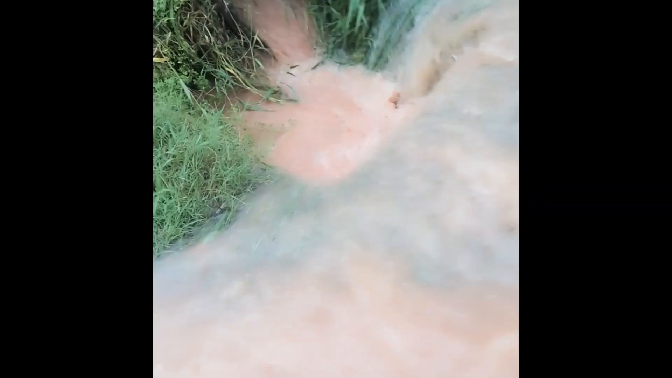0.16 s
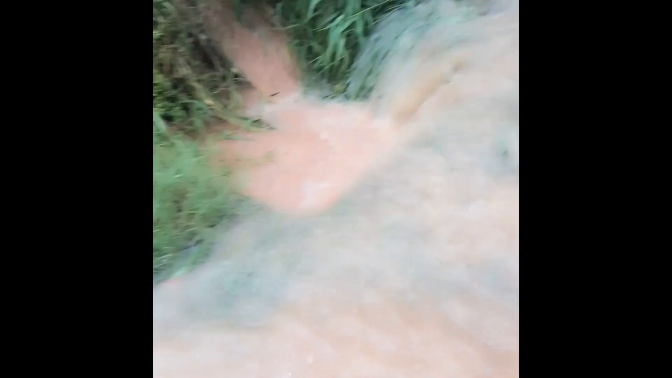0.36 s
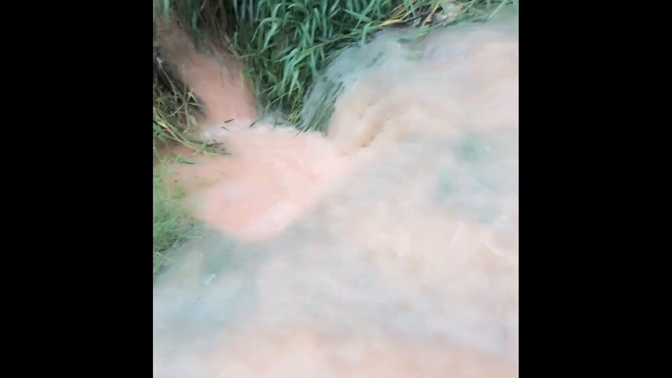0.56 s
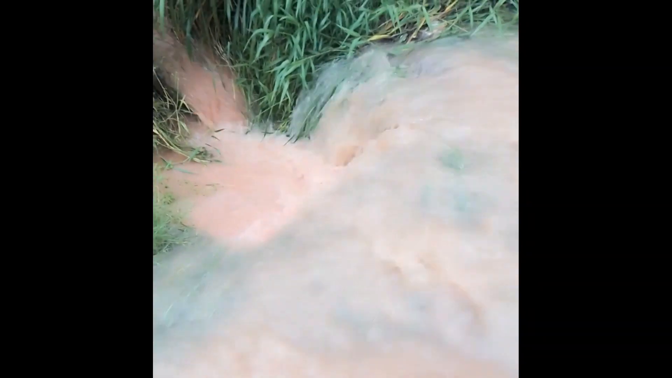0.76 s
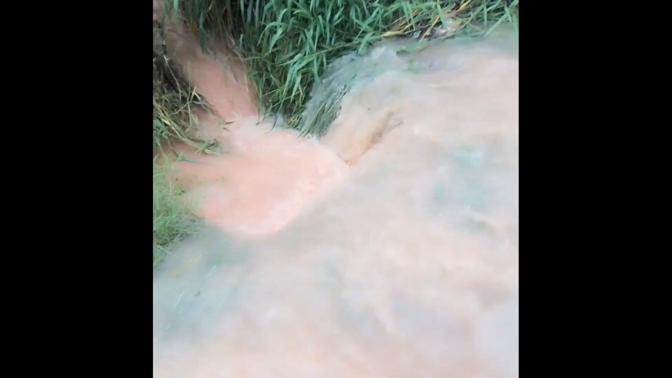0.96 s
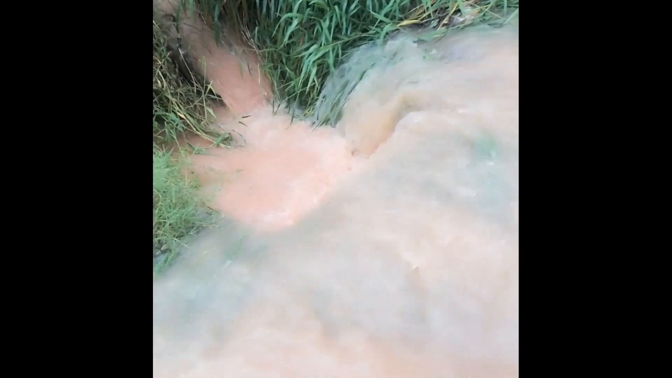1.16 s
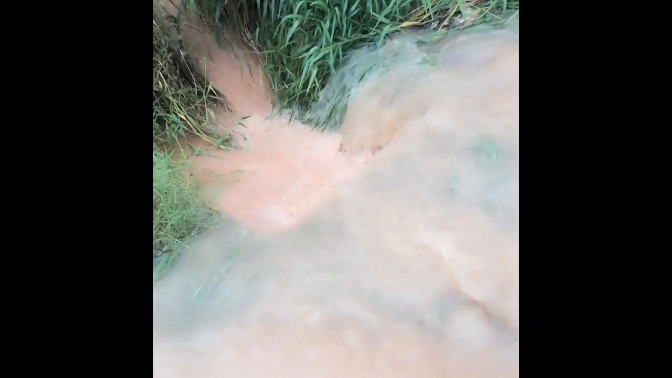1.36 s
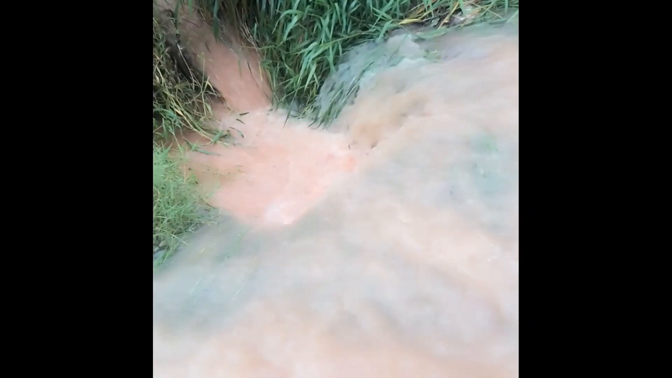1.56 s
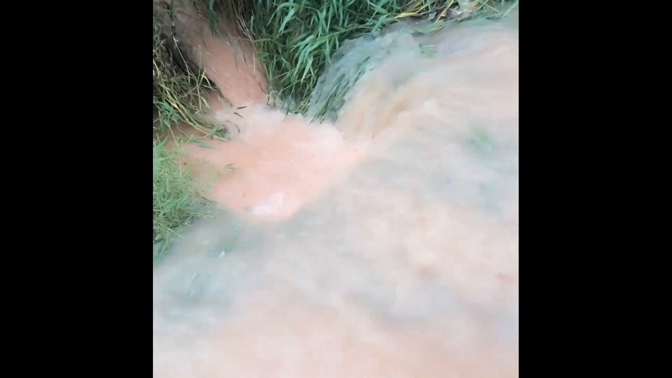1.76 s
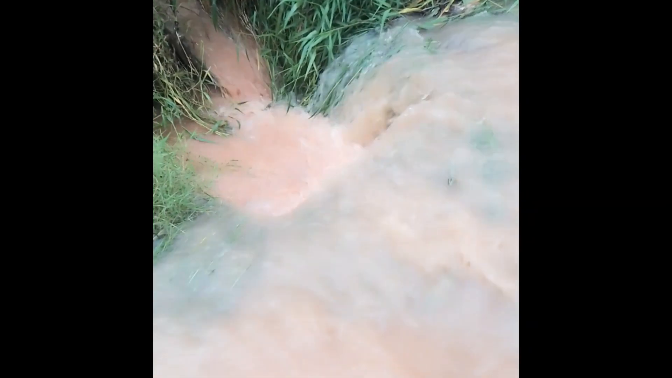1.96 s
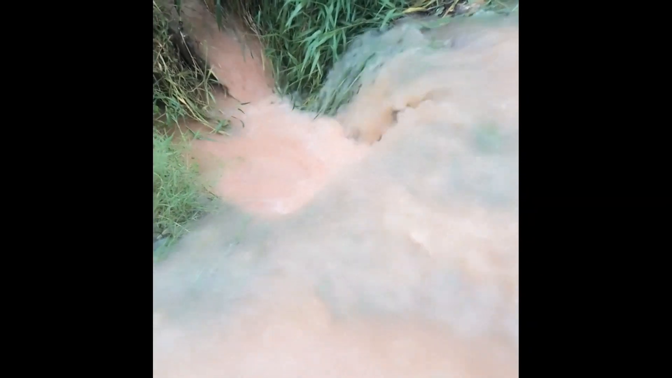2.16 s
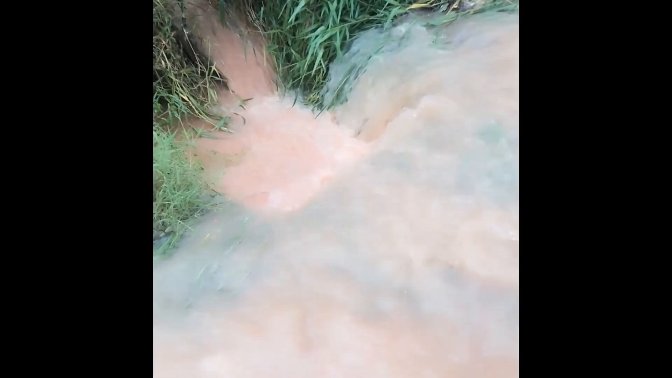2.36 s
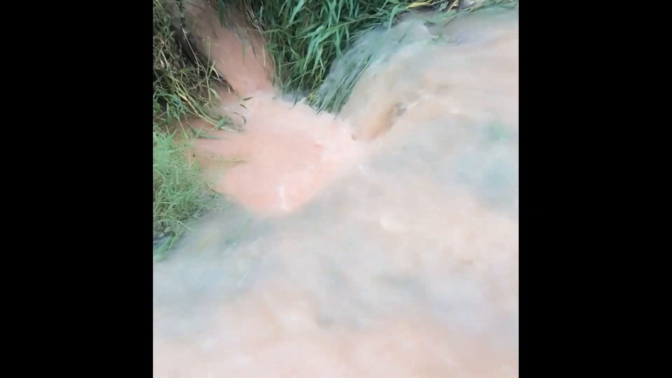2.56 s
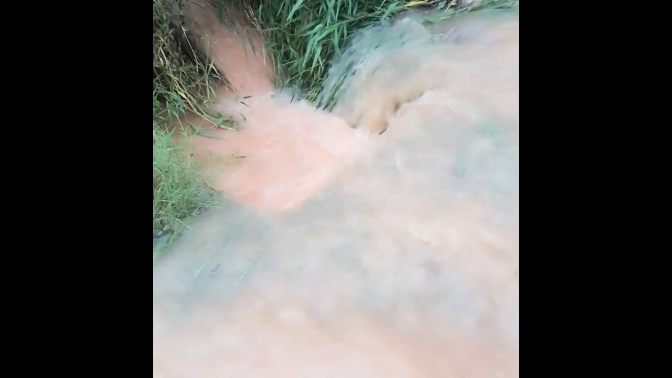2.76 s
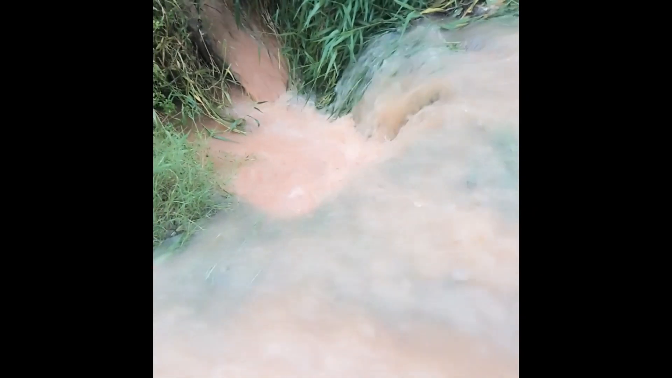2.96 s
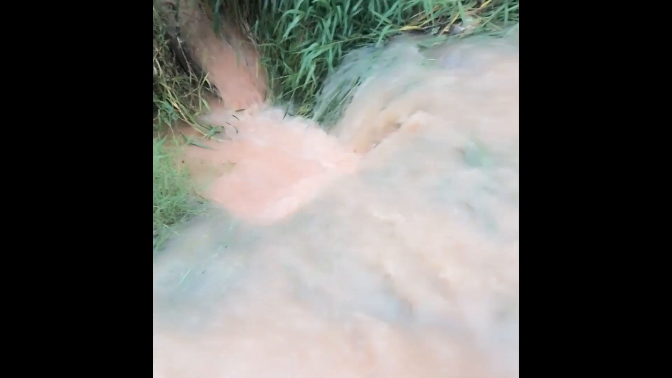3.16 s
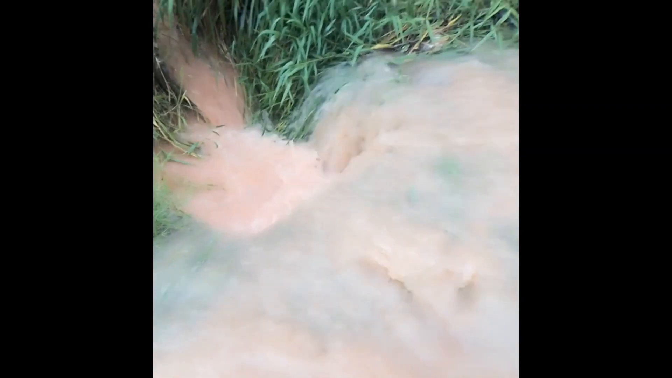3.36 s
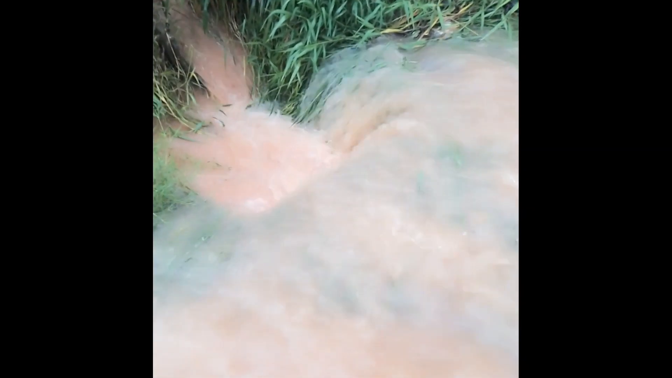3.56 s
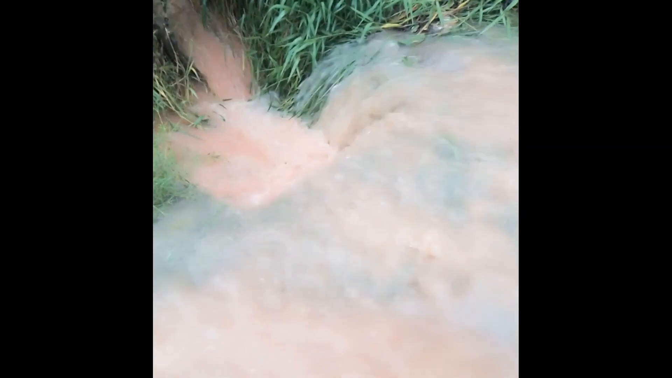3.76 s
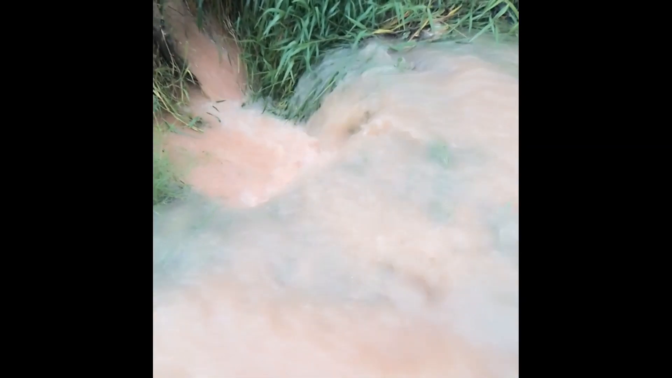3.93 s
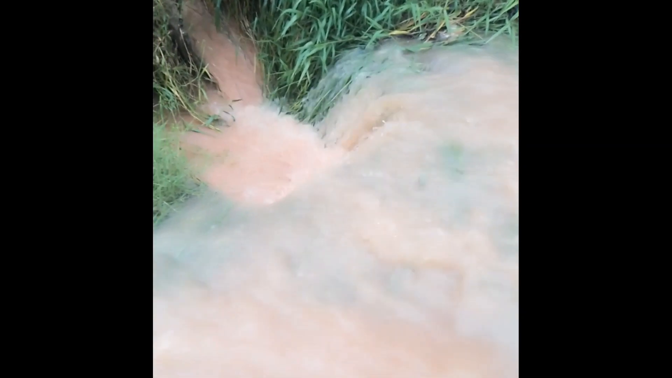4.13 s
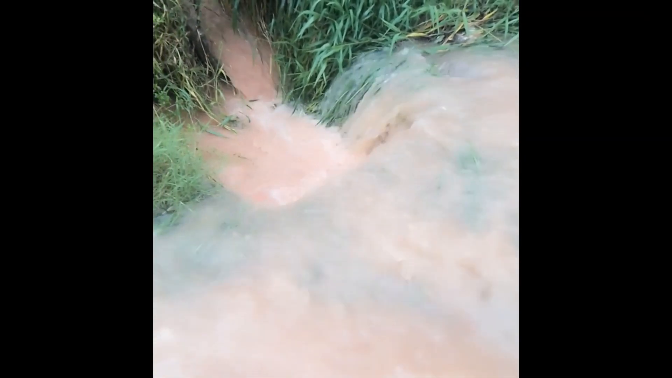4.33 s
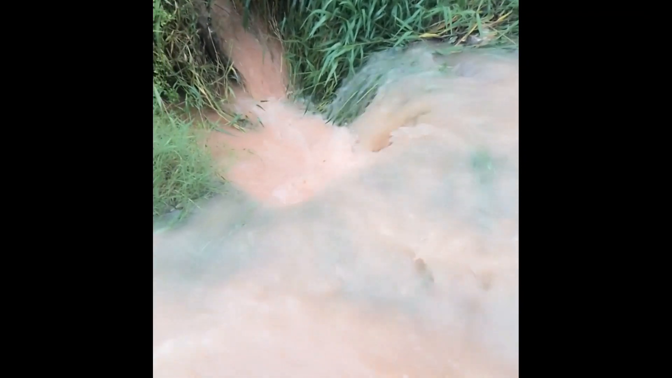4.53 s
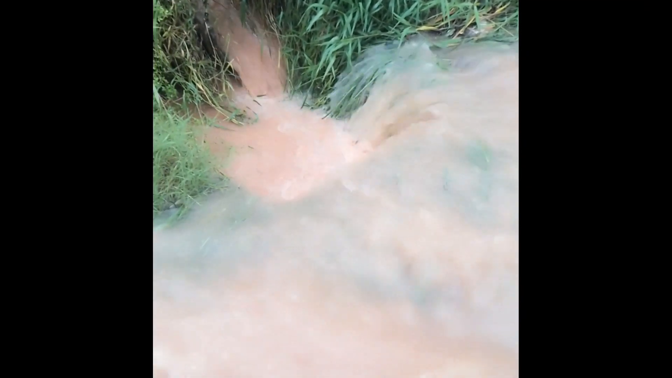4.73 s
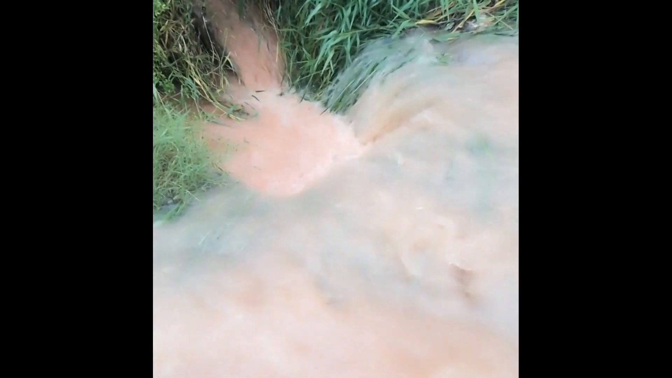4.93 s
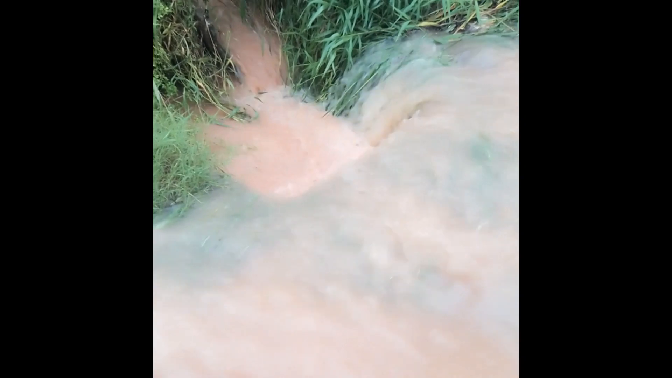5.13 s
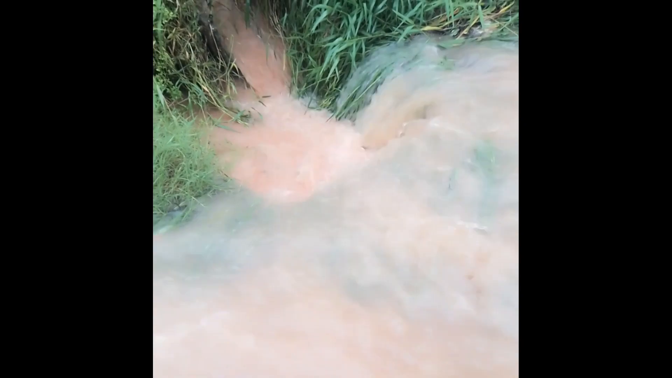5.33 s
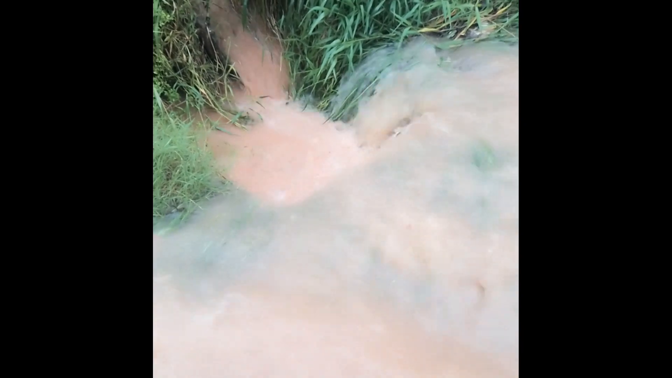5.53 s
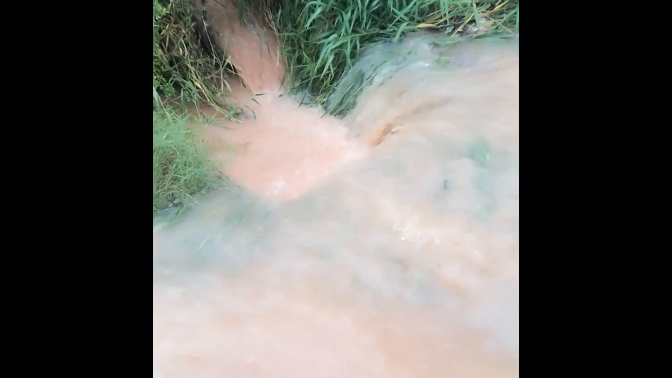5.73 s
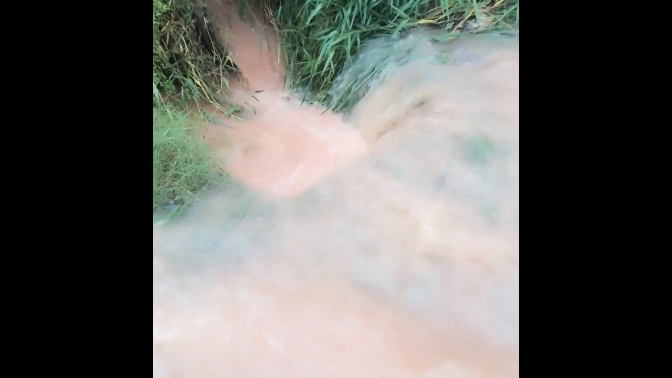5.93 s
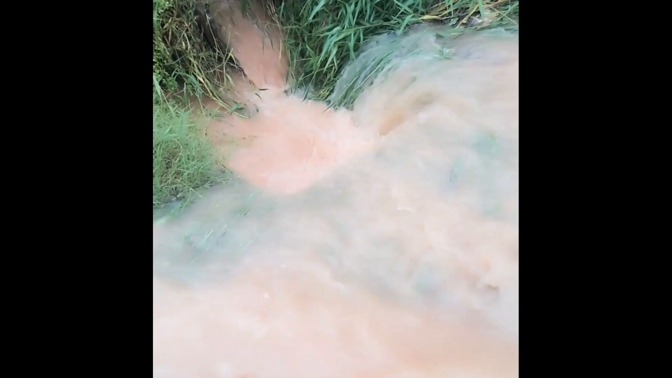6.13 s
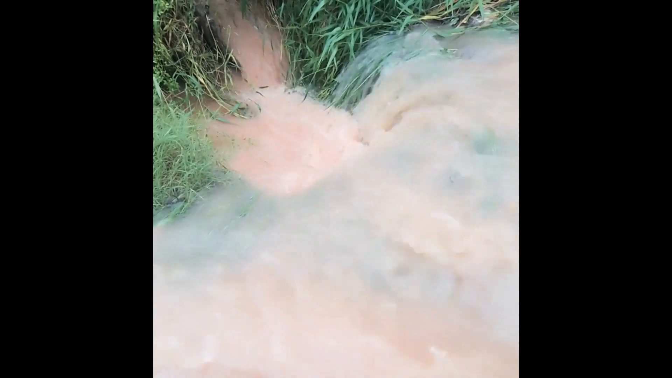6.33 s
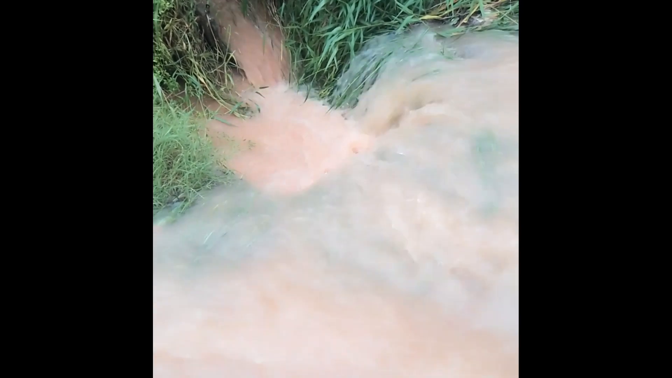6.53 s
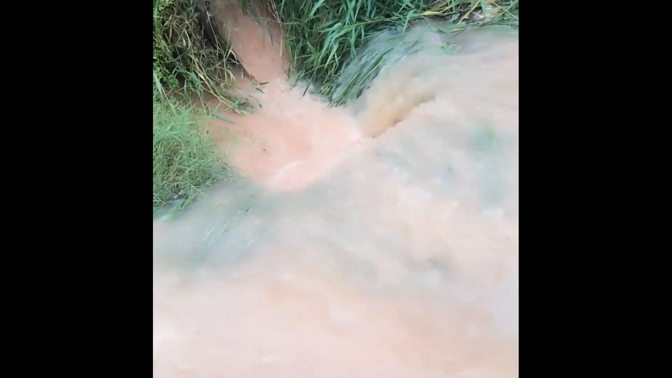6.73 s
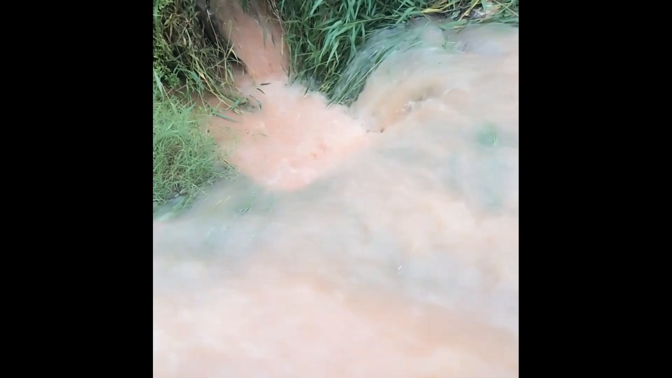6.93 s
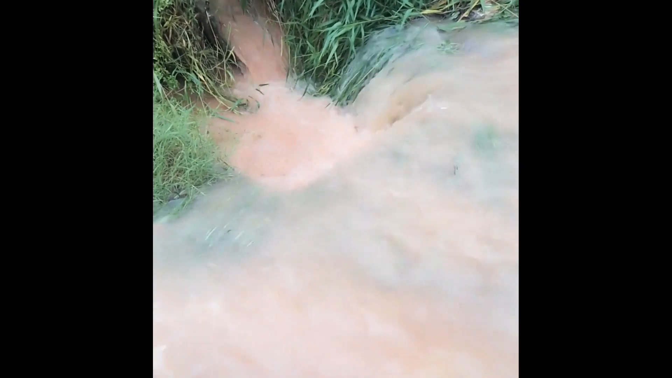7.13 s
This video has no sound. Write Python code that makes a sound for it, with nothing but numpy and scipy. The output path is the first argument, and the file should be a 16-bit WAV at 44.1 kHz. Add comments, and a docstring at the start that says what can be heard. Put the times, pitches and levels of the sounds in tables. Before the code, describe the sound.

Close, continuous roar of fast runoff plunging into a ditch, gurgling with hollow glugs and small splats over a soft low rumble.

```python
"""Storm runoff in a ditch

Muddy water rushes down a grassy ditch, heard close by from the bank, where a side stream plunges in.
Swallowed air roars as a swarm of big ringing bubbles and small ones splash; larger single ones gulp.
Splats ring, slaps and foam are shaped noise and fizz, and low noise makes the bed rumble and thump.
The sound fades in; halfway the hand-held microphone shifts: the roar turns hollow and spreads out."""
import sys
import numpy as np
from scipy import signal
from scipy.fft import rfft, irfft, next_fast_len
from scipy.io import wavfile

SR = 44100
rng = np.random.default_rng(int(sys.argv[2]) if len(sys.argv) > 2 else 0)


def put_to_file(sound):
    """Save the sound as 16-bit audio at rate SR, in the file named by the first command-line argument."""
    columns = np.atleast_2d(sound).T  # one column per channel
    safe = np.clip(columns, -1, 1)
    whole_steps = np.round(safe * 32767)
    wavfile.write(sys.argv[1], SR, whole_steps.astype(np.int16))


N = 317079
TIME = np.arange(N) / SR   # seconds
FFT_SIZE = next_fast_len(N + 8192)
BIN_HZ = np.maximum(np.arange(FFT_SIZE // 2 + 1) * SR / FFT_SIZE, 1)


# colour of the roar at the first and second microphone position:
# (pitch [Hz], left level [dB], right level [dB])
ROAR_COLOUR_FIRST = [(156, -25, -22), (198.5, -20.5, -21.5), (281.5, -5.5, -10), (380, -10, -3),
                     (470, -4.5, -3.5), (540, -2.3, 0), (636, -6, -4.5), (720, -2.5, -2.5), (850, -6.5, -4),
                     (908, -3.5, -6), (954, -11, -13), (1113, -5, -27), (1144, -12, -21.5),
                     (1300, -23, -15.5)]
ROAR_COLOUR_SECOND = [(160, -30, -35), (200, -19, -19.5), (283, -4, -8), (333, -5.5, -15.5),
                      (382, -3.5, -16), (500, -13.5, -7), (630, -11, 0.1), (703, -12, -2.5),
                      (790, -17.5, -3), (840, -12.5, -3.5), (1027, -4.5, -19.5), (1088, -11, -36),
                      (1255, -25.5, -15)]
# wavering colour of the roar:
# (time [s], lift near 300 Hz [dB], lift near 440 Hz [dB], lift near 1.1 kHz [dB])
ROAR_WAVER = [(0.55, 0.5, 1, 2), (1.05, -3, -0.5, 3), (1.35, 0, 0, -1.5), (1.65, 1.5, -3, 0.8),
              (2.2, -0.2, 0, 1.7), (2.8, -2, 0, 0.5), (3.35, 1.5, -2.5, -2.5), (3.9, 2, 1.5, 2),
              (4.35, 2, 1.5, 4), (4.75, 1.5, 1, -0.5), (5.05, 2, -1.5, 1), (5.4, -1, 0.5, 2),
              (5.75, 3, -5, -8), (6.05, -2.5, -3, 2.5), (6.55, -0.5, 1.5, 1), (7.0, 4, -3.5, 5)]
ROAR_FIRST_DB, ROAR_SECOND_DB = -36.5, -38.5   # louder at the first position


def roar(second):
    """Big bubbles driven under by the plunge, blended from two microphone positions (second: 0-1)."""
    bubbles = swarm(200.2, 1259, per_s=1500, spread_db=1.5, cycles=25.5, rise=0.094, wash_db=-3,
                    runs_db=2.0, count=24)
    water = churn(bubbles, surge_db=0.05, surge_rate=24, swell_db=0.17, swell_rate=13)
    lower_db, middle_db, upper_db = in_time(ROAR_WAVER)
    water = lift_band(water, 390, 490, middle_db)
    water = lift_band(water, 280, 327, lower_db)
    water = lift_band(water, 1016, 1200, upper_db)
    first_pair = from_db(ROAR_FIRST_DB) * at_ears(water, ROAR_COLOUR_FIRST, 184, 1212)
    second_pair = from_db(ROAR_SECOND_DB) * at_ears(water, ROAR_COLOUR_SECOND, 166, 1198)
    return (1 - second) * first_pair + second * second_pair


# big single air pockets, level before the trim in gulps():
# (time [s], level [dB], starting pitch [Hz], ring length [cycles])
AIR_POCKETS = [(0.41, -15.5, 620, 30), (0.508, -21.5, 430, 36), (0.514, -27, 1005, 91),
               (0.78, -14, 665, 59), (0.795, -28, 1090, 86), (0.988, -22.5, 1035, 93),
               (1.475, -23, 777, 58), (1.625, -17.5, 549, 64), (1.632, -22, 290, 30),
               (1.989, -15.5, 546, 31), (2.382, -17, 590, 35), (2.44, -24, 258, 26),
               (2.645, -19.5, 660, 46), (2.741, -15.5, 510, 23), (3.064, -14.5, 607, 22),
               (3.176, -15.5, 480, 31), (3.368, -19, 1160, 27), (3.686, -16, 640, 30), (4.04, -20, 392, 26),
               (4.287, -30, 766, 40), (4.386, -21, 950, 65), (4.455, -25, 940, 56), (5.012, -25, 272, 32),
               (5.322, -25, 720, 18), (5.504, -24, 444, 39), (5.633, -19, 724, 18), (5.685, -19.5, 630, 29),
               (5.74, -20, 605, 23), (5.764, -21, 288, 38), (5.891, -24, 990, 70), (6.007, -18.5, 790, 34),
               (6.214, -17, 670, 29), (6.263, -19.5, 750, 55), (6.344, -27, 424, 36), (6.415, -22, 622, 22),
               (6.659, -24, 955, 60)]


def gulps():
    """Big air pockets, each ringing at its own pitch like a struck bell that glides upward."""
    return single_bubbles(AIR_POCKETS, rise=0.096, level_db=-10.5, low_hz=203, high_hz=1380, left_db=0)


# colour of the splashing: (pitch [Hz], left level [dB], right level [dB])
SPLASH_COLOUR = [(1250, 1, 0.5), (1430, -1, -6), (1670, -5, -4), (1840, -2.5, -8), (2170, 0, -8),
                 (2410, -8, -11.5), (2620, -8, -5.5)]
# lift of the highest splash bubbles: (time [s], lift near 2.15 kHz [dB])
SPLASH_TOP = [(0.15, 14.5), (0.25, 12), (0.4, 2), (2.9, 3), (3.75, -2), (5.5, 1), (6.2, -3), (6.9, 0)]
SPLASH_DB = -57.5


def splash():
    """Small bubbles, born in quick clumps where the crests tumble over."""
    bubbles = swarm(1218, 2620, per_s=700, spread_db=2.0, cycles=58, rise=0.064, wash_db=-4,
                    clump_db=2.0, runs_db=2.5, count=22)
    water = churn(bubbles, surge_db=0.18, surge_rate=21, swell_db=0.34, swell_rate=9.3)
    top_db, = in_time(SPLASH_TOP)
    water = lift_band(water, 2130, 2170, top_db)
    return from_db(SPLASH_DB) * at_ears(water, SPLASH_COLOUR, 1326, 2550)


# thrown water falling back, level before the trim in splats():
# (time [s], level of the first bubble [dB], middle pitch [Hz])
FALLING_WATER = [(0.433, -46, 1500), (0.494, -43, 1750), (0.581, -40, 1880), (0.785, -38, 1370),
                 (0.788, -45, 2400), (0.955, -42, 1870), (1.244, -53, 3090), (1.621, -43.5, 1530),
                 (1.803, -40, 1400), (2.144, -43, 2080), (2.246, -40, 2000), (2.623, -44, 1670),
                 (2.721, -43, 2300), (3.44, -40, 1970), (3.495, -36, 1840), (3.54, -44, 1570),
                 (4.091, -44, 2120), (5.018, -47, 1930), (5.051, -36, 1860), (5.1, -44, 1410),
                 (5.144, -46, 3180), (6.064, -45, 2150), (6.177, -44.5, 2280), (6.52, -43, 2120),
                 (6.64, -40, 1750), (6.647, -45, 2440), (6.791, -40, 1410), (6.794, -51, 3020),
                 (6.812, -50, 2130)]
SPLAT_GAP_S, SPLAT_LOSS_DB = 0.0038, 3   # average gap and loss from bubble to bubble
SPLAT_OCTAVES, SPLAT_CYCLES = 0.14, 37   # spread in pitch either way, ring length


def splats():
    """Each splat traps four bubbles of about one size, in quick succession and ever weaker."""
    chance = rng.uniform(-0.965, 1, (len(FALLING_WATER), 4, 2))
    bubbles = []
    for (s, db, hz), draws in zip(FALLING_WATER, chance):
        for k, (late, detune) in enumerate(draws):
            born_s = s + SPLAT_GAP_S * k * (1 + 0.294 * late)
            pitch_hz = hz * 2 ** (SPLAT_OCTAVES * detune)
            bubbles.append((born_s, db - SPLAT_LOSS_DB * k, pitch_hz, SPLAT_CYCLES))
    return single_bubbles(bubbles, rise=0.081, level_db=-6.0, low_hz=1210, high_hz=3500, left_db=6)


# sheets of water slap flat onto the surface: (time [s], noise level before the filter [dB])
FLAT_SLAPS = [(0.787, -32), (2.721, -35), (3.495, -42), (4.09, -39), (5.053, -41), (6.177, -41),
              (6.645, -37), (6.793, -39)]
SLAP_DECAY_S = 0.0018


def slaps():
    """Each slap is a burst of noise that starts at once and dies in milliseconds."""
    envelope = np.zeros(N)
    for s, db in FLAT_SLAPS:
        envelope += from_db(db) * (TIME >= s) * np.exp(-abs(TIME - s) / SLAP_DECAY_S)
    burst = (envelope + 1e-18) * rng.standard_normal((2, N))
    return keep_band(burst, 4, 1550, 2550)


# colour of the foam: (pitch [Hz], left level [dB], right level [dB])
FOAM_COLOUR = [(2600, -6, 0.5), (3100, -2, -6.5), (3820, -5.5, -4), (4700, 0.5, -9.5), (5330, -1.5, -7.5),
               (6160, -6, -5.5), (7240, -9, -8), (9000, -7, -7.5), (10500, -8.5, -10), (11700, -11.5, -14),
               (13000, -11, -14.5), (14100, -14, -17)]
FOAM_DB, FOAM_SECOND_RISE_DB = -61.0, 0.63   # the second position picks up a little more


def foam(second):
    """Bursting foam and falling spray: a fine fizz of tiny bubbles in a hiss."""
    bubbles = swarm(2602, 13630, per_s=2400, spread_db=3.0, cycles=190, rise=0.021, wash_db=5.0, count=44)
    water = bubbles * from_db(0.7 * eddies(10.5))
    return from_db(FOAM_DB + FOAM_SECOND_RISE_DB * second) * at_ears(water, FOAM_COLOUR, 2680, 14000)


# colour of the rumble of the bed: (pitch [Hz], left level [dB], right level [dB])
RUMBLE_COLOUR = [(25, -21, -21), (45, -17, -18), (74, -12.5, -13), (110, -2.5, -2), (128, -1, -3.5),
                 (154, -12, -12)]
# masses of water drop onto the bed: (time [s], lift of the rumble's deep resonance [dB])
BED_THUMPS = [(0.42, 7), (0.5, 5), (1.96, 6), (2.04, 4), (2.25, 8.5), (3.42, 9), (3.77, 8), (4.11, 6),
              (5.02, 8), (5.8, 10), (5.93, 5), (6.23, 3), (6.3, 6)]
RUMBLE_DB, THUMP_S = -68, 0.036   # each thump builds up and dies away in about THUMP_S


def rumble():
    """The mass of water tumbling along the bed: low noise, lifted by each thump."""
    water = churn(rng.standard_normal((2, N)), surge_db=1.5, surge_rate=12, swell_db=0.4, swell_rate=9.2)
    thump_db = sum(rise_db * hump(s, THUMP_S) for s, rise_db in BED_THUMPS)
    water = lift_band(water, 85, 145, thump_db)
    return from_db(RUMBLE_DB) * at_ears(water, RUMBLE_COLOUR, 22, 156)


# waves break and troughs pass:
# (time [s], rise of the roar [dB], rise of the splashing [dB], time to build up or die away [s])
PASSING_WAVES = [(0.18, 0.5, 0.5, .07), (0.54, 0, 2.5, 0.059), (0.789, 3.8, 3, 0.02),
                 (0.87, -1, 0.5, 0.078), (1.05, 1, 1.5, .04), (1.22, 2.4, 1, 0.064), (1.43, 2, 1, 0.027),
                 (1.64, 2, -0.5, 0.026), (1.82, 1, 0, .04), (1.97, 0.6, 1.5, 0.035), (2.08, -2.5, 0, 0.018),
                 (2.63, 1, -1, 0.033), (2.78, 2, -1, .04), (3.01, 2, 1, 0.049), (3.33, 3, 2, .06),
                 (3.47, 1.3, 2, .06), (3.62, -0.5, 0.5, 0.027), (4.12, -3, -1, 0.041),
                 (4.75, -0.5, -1, .05), (5.06, 1, 0.5, 0.055), (5.72, -0.5, -1.5, 0.03),
                 (6.18, -2.5, 1, 0.015), (6.27, 2.5, -0.7, 0.045), (6.61, 2, -1, 0.053)]


def waves():
    """Each wave or trough is a smooth hump: dB added to the roar and to the splashing."""
    return sum(np.outer(rises, hump(s, width_s)) for s, *rises, width_s in PASSING_WAVES)


def bubble(hz, cycles, rise):
    """A bubble dies by 60 dB within `cycles`; its pitch rises as it nears the surface."""
    age = np.arange(int(cycles * SR / hz) + 2) * hz / (cycles * SR)   # 0 at birth, 1 at the end
    ring = np.sin(2 * np.pi * cycles * age * (1 + rise * age / 2))
    return ring * np.exp(-np.log(1000) * age)


def single_bubbles(events, rise, level_db, low_hz, high_hz, left_db):
    """Bubbles that ring out above the swarm; left is louder than right by left_db."""
    out = np.zeros(N)
    for s, event_db, hz, cycles in events:
        start = int(s * SR)
        ring = bubble(hz, cycles, rise)[:N - start]
        out[start:start + len(ring)] += from_db(event_db + level_db) * ring
    # a bubble closes softly, under water
    soft = keep_band(out, 4, low_hz, high_hz)
    return soft * from_db([[left_db / 2], [-left_db / 2]])


CLUMPS_PER_S, RUNS_PER_S = 35, 9   # how quickly birth rates swing: all pitches together, each pitch alone


def swarm(low_hz, high_hz, per_s, spread_db, cycles, rise, wash_db, clump_db=0, runs_db=0, count=20):
    """Two unrelated streams of bubbles of random strength at `count` pitches, equal power per Hz."""
    near = np.zeros((2, N))
    births_per_s = per_s * from_db(clump_db * eddies(CLUMPS_PER_S))
    for hz in np.geomspace(low_hz, high_hz, count):
        runs = from_db(runs_db * eddies(RUNS_PER_S)) if runs_db else 1
        born = rng.random((2, N)) < runs * births_per_s / count / SR
        size, side = rng.random((N // 10, 2))[:born.sum()].T
        # many weak bubbles, few strong ones, pushing either way at first
        strength = from_db(-spread_db * np.log(np.maximum(size, .02)))
        clicks = np.zeros((2, N))
        clicks[born] = strength * np.sign(side - .5)
        rings = signal.oaconvolve(clicks, bubble(hz, cycles, rise)[None], axes=1)[:, :N]
        near += np.sqrt(hz) * rms_one(rings)
    # countless far bubbles merge into a smooth wash, wash_db relative to the near ones
    wash = rng.standard_normal((2, N)) * np.sqrt(SR / 2 / (high_hz - low_hz))
    return rms_one(near) + from_db(wash_db) * wash


def eddies(rate):
    """Smooth random swings of spread 1, about `rate` a second: slow noise, joined by lines."""
    r = np.exp(-40 * np.pi * rate / SR)   # made at every 20th sample
    noise = rng.standard_normal(N // 20 + 2002)
    slow = signal.lfilter([1], [1, -2 * r, r * r], noise)[2000:]   # skip the settling
    return np.interp(np.arange(N) / 20, np.arange(len(slow)), rms_one(slow))


def churn(water, surge_db, surge_rate, swell_db, swell_rate):
    """Quick eddies and slower ones make the water swell and sink."""
    return water * from_db(surge_db * eddies(surge_rate) + swell_db * eddies(swell_rate))


# a wide source at two ears: (pitch [Hz], likeness [0-1], phase by which left leads [radians])
EAR_LIKENESS = [(25, .75, 0), (100, .95, 0), (250, .96, -.1), (420, .87, -.8), (640, .92, -.6),
                (920, .8, -.15), (1200, .4, -1.4), (1700, .45, -.8), (2200, .6, -2.2), (3000, .13, -3.0),
                (12000, .03, -3.1)]


def at_ears(streams, colour, low_hz, high_hz):
    """Two unrelated streams become a coloured, partly alike stereo pair in one band; mid rms is 1."""
    near, other = rfft(streams, FFT_SIZE)
    left_db, right_db = in_frequency(colour)
    alike, lead = in_frequency(EAR_LIKENESS)
    band = 1 / np.sqrt((1 + (low_hz / BIN_HZ) ** 36) * (1 + (BIN_HZ / high_hz) ** 36))
    left = near * from_db(left_db)
    mixed = alike * near + np.sqrt(1 - alike ** 2) * other
    right = mixed * from_db(right_db) * np.exp(-1j * lead)
    pair = irfft(np.array([left, right]) * band, FFT_SIZE)[:, :N]
    return pair / np.std(pair.mean(axis=0))


def keep_band(x, order, low_hz, high_hz):
    """Keep one band of pitches."""
    return signal.sosfilt(signal.butter(order, [low_hz, high_hz], "band", fs=SR, output="sos"), x)


def lift_band(x, low_hz, high_hz, lift_db):
    """Raise or lower one band with gentle edges."""
    return x + (from_db(lift_db) - 1) * keep_band(x, 1, low_hz, high_hz)


def hump(s, width_s):
    """A smooth rise to 1 at time s, and back."""
    return np.exp(-((TIME - s) / width_s) ** 2)


def in_time(rows):
    """The columns of a curve at every sample."""
    s, *columns = np.transpose(rows)
    return [np.interp(TIME, s, c) for c in columns]


def in_frequency(rows):
    """The columns of a spectrum at every bin."""
    hz, *columns = np.transpose(rows)
    return [np.interp(np.log(BIN_HZ), np.log(hz), c) for c in columns]


def from_db(db):
    """Decibels to gain."""
    return 10 ** (np.asarray(db) / 20)


def rms_one(x):
    """Scale to rms 1."""
    return x / np.sqrt(np.mean(x ** 2) + 1e-20)


# microphone position: (time [s], share of the second position [0-1])
MICROPHONE_SHIFT = [(2.9, 0.02), (3.2, 0.25), (3.45, 0.38), (3.75, 0.95), (4.3, 1), (5.8, 0.84),
                    (6.25, 0.97), (6.55, 0.74), (6.95, 0.86)]


def scene():
    """Roar, splashing, foam and rumble, with single gulps, splats and slaps on top."""
    second, = in_time(MICROPHONE_SHIFT)
    roar_gain, splash_gain = from_db(waves())
    stream = roar_gain * roar(second) + splash_gain * splash() + foam(second) + rumble()
    return stream + gulps() + splats() + slaps()


FADE_START_S, FADE_END_S, CUTOFF_HZ = 0.13, 0.45, 14200


def record(dry):
    """The sound fades in from silence, and a steep low-pass filter cuts the top."""
    fade = np.clip((TIME - FADE_START_S) / (FADE_END_S - FADE_START_S), 0, 1) ** 1.13
    return signal.sosfilt(signal.ellip(12, .1, 80, CUTOFF_HZ, fs=SR, output="sos"), dry * fade)


dry = scene()
out = record(dry)
put_to_file(out)
```